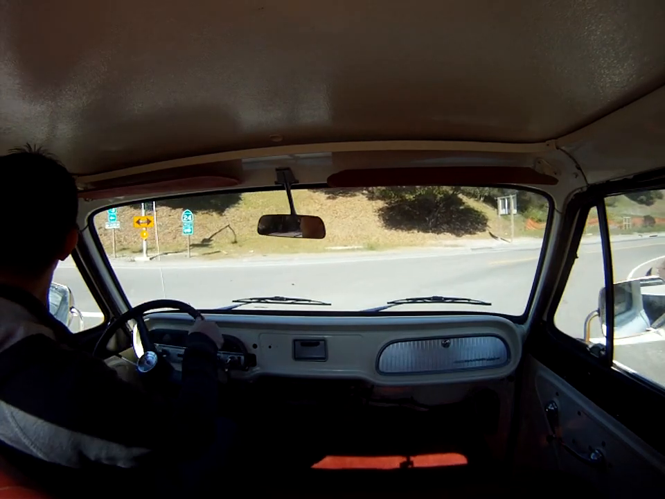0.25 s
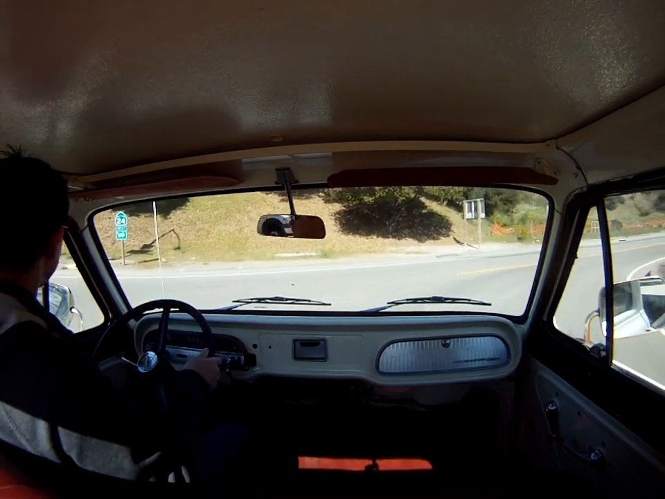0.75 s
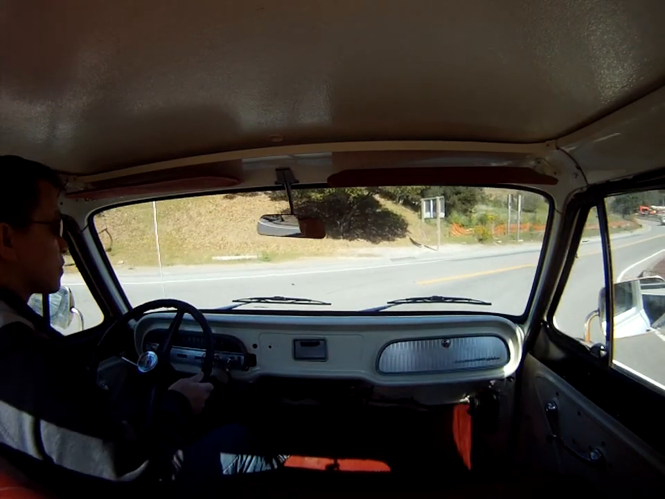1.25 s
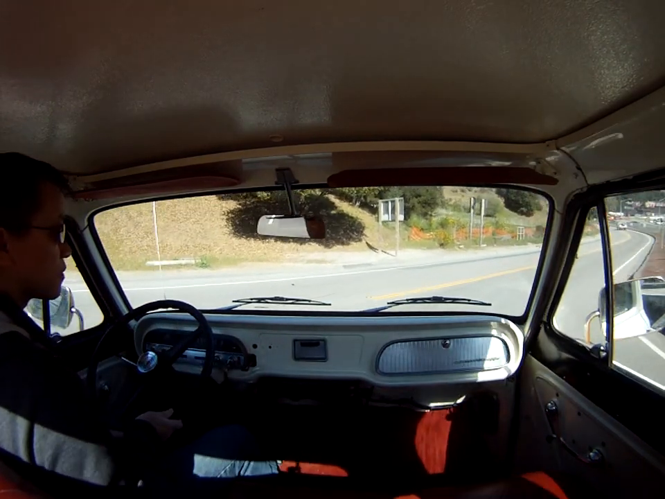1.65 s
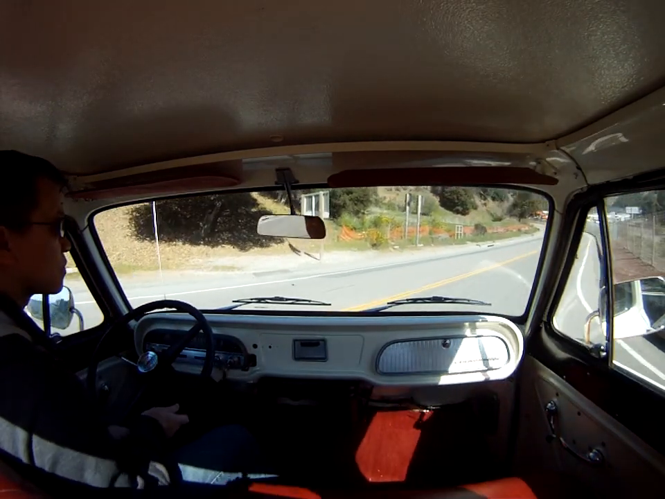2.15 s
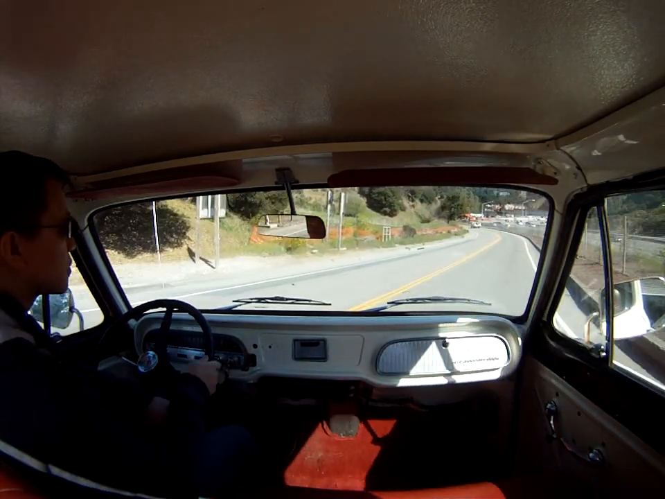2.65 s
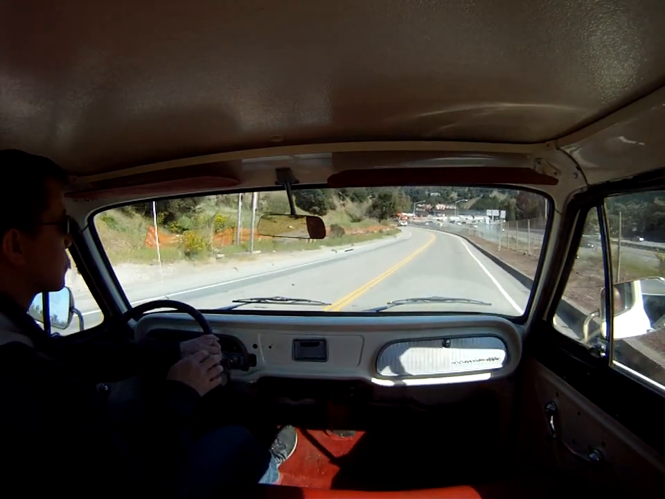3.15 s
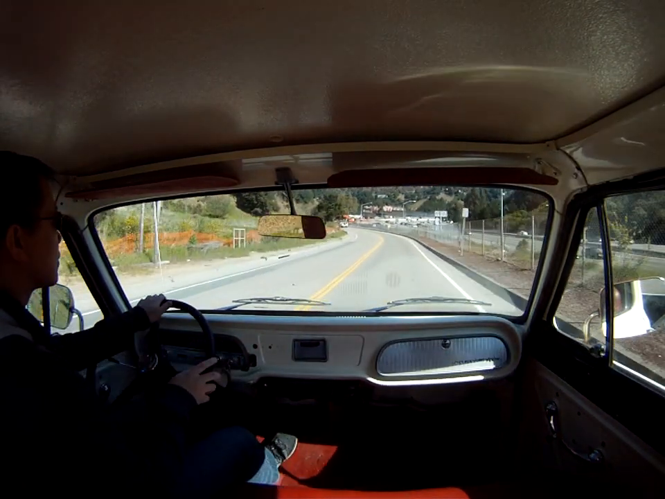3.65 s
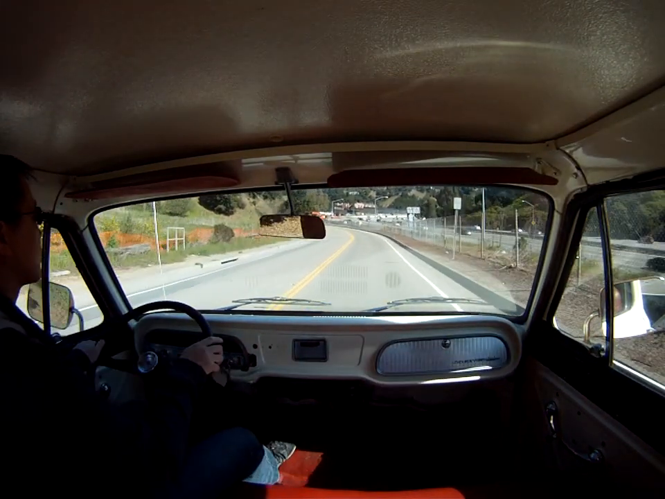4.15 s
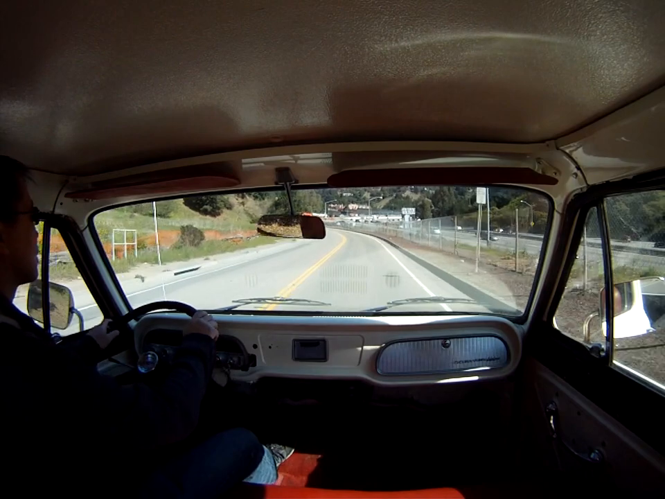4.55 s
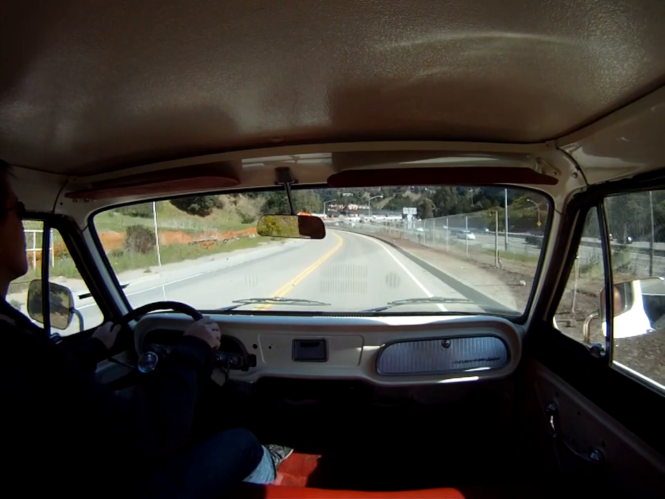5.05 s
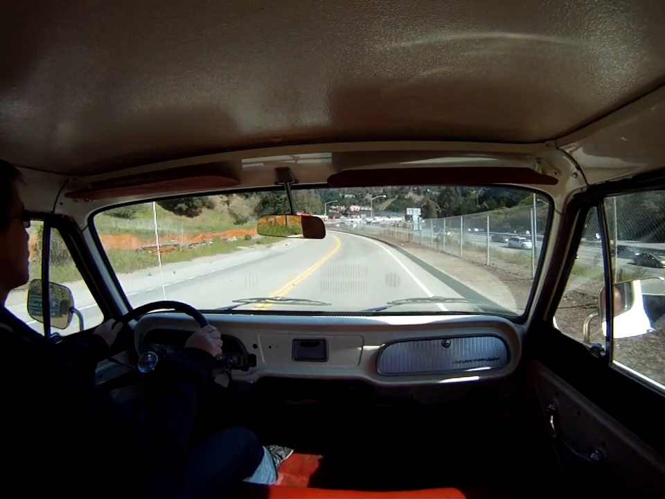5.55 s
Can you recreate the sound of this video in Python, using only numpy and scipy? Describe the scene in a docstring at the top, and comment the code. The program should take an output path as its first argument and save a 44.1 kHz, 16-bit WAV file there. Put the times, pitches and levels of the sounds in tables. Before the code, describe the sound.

A gear lever knocks home over the chugging idle of an old air-cooled truck engine. After about a second the revs jump and keep rising in one long pull, with a hollow boom swelling and fading. Tyre rumble, rushing air and chattering loose panels grow with it, along with a few small knocks. The microphone sits in the middle of the closed-in cab.

```python
"""Inside the cab of an old pickup with an air-cooled flat six at the back.
The engine idles while the gear lever clunks home, then takes up the load and climbs steadily in pitch.
Exhaust orders boom through the cab's resonances over road rumble, fan rush, valve clatter and loose trim.
A small camera samples it all at 12 kHz and holds each sample, which adds a thin fizz on top."""
import sys
import numpy as np
from scipy import signal
from scipy.fft import rfft, irfft, next_fast_len
from scipy.io import wavfile

SR = 44100
rng = np.random.default_rng(int(sys.argv[2]) if len(sys.argv) > 2 else 0)


def put_to_file(sound):
    """Save the sound as 16-bit audio at rate SR, in the file named by the first command-line argument."""
    columns = np.atleast_2d(sound).T  # one column per channel
    safe = np.clip(columns, -1, 1)
    whole_steps = np.round(safe * 32767)
    wavfile.write(sys.argv[1], SR, whole_steps.astype(np.int16))


N = 256220
T = np.arange(N) / SR

# tone of the floor, under tyre roar and lever thuds: frequency_hz, level_db
FLOOR_SPECTRUM = [(180, -7), (250, 3), (300, -1), (345, 1), (410, -0.5), (500, 0.5), (590, 0.5), (690, -3),
                  (780, -19), (1000, -14), (1500, -26)]
# tone of the engine bay, for fan and valves: frequency_hz, level_db
BAY_SPECTRUM = [(750, -1), (800, -3), (1050, -5.5), (1330, -9), (1550, -7), (1800, -9), (2000, -4.5),
                (2280, -2), (2550, -7.5), (3300, -11.5), (3700, -17.5), (4100, -19), (5100, -18),
                (6000, -24.5)]


def from_db(db):
    """Decibels to gain."""
    return 10 ** (np.asarray(db) / 20)


def rms_one(x):
    """Scale to unit rms."""
    return x / np.sqrt(np.mean(x ** 2) + 1e-20)


def in_time(rows):
    """Each column of a curve table at every sample."""
    time_s, *columns = np.transpose(rows)
    return [np.interp(T, time_s, column) for column in columns]


def under_load(idle, loaded, load):
    """Crossfade from the idling value to the value under load."""
    return idle + load * (loaded - idle)


def drift(rate_hz):
    """Smooth random wander with a spread of 1, mostly slower than rate_hz."""
    hop = 40
    pole = np.exp(-2 * np.pi * rate_hz * hop / SR)
    white = rng.standard_normal(N // hop + 2002)
    slow = signal.lfilter([1], [1, -2 * pole, pole * pole], white)[2000:]
    return np.interp(np.arange(N) / hop, np.arange(len(slow)), rms_one(slow))


def coloured(x, spectrum):
    """Shape x with an EQ curve that falls 30 dB an octave beyond its ends; unit rms."""
    hz, db = np.transpose(spectrum)
    size = next_fast_len(N)
    octave, points = np.log2(np.fft.rfftfreq(size, 1 / SR) + 1), np.log2(hz)
    beyond = np.abs(octave - np.clip(octave, points[0], points[-1]))
    gain = from_db(np.interp(octave, points, db) - 30 * beyond)
    return rms_one(irfft(rfft(x, size) * gain, size)[:N])


def noise(spectrum):
    """Noise of the given spectrum, at unit rms."""
    return coloured(rng.standard_normal(N), spectrum)


def band(x, low_hz, high_hz):
    """Gentle band-pass."""
    return signal.sosfilt(signal.butter(2, [low_hz, high_hz], "band", fs=SR, output="sos"), x + 1e-18)


def clicks_at(start_s, db):
    """One click for each blow."""
    hits = np.zeros(N)
    hits[(np.asarray(start_s) * SR).astype(int)] = from_db(db)
    return hits


def blows(start_s, db, t60_s):
    """Envelope that jumps at each blow and dies away."""
    return signal.lfilter([1], [1, -from_db(-60 / (t60_s * SR))], clicks_at(start_s, db) + 1e-18)


def ring(clicks, hz, t60_s):
    """Each click strikes a decaying sine of its own height."""
    decay, angle = from_db(-60 / (t60_s * SR)), 2 * np.pi * hz / SR
    return signal.lfilter([0, np.sin(angle)], [1, -2 * decay * np.cos(angle), decay ** 2], clicks + 1e-18)


def resonance_db(hz, centre_hz, width_hz, lift_db):
    """Lift of one resonance at a given frequency."""
    return lift_db / (1 + (2 * (hz - centre_hz) / width_hz) ** 2)


def unlike_noise():
    """Faint steady noise, unlike in the two channels: the only width in an almost mono scene."""
    # tone of the side signal: frequency_hz, level_db
    side_spectrum = [(15, -32), (25, -0.5), (157, -3), (579, -20), (1000, -20), (2040, -34), (3620, -38),
                     (4990, -35), (6000, -45), (7800, -79), (13200, -120)]
    return from_db(-55.5) * noise(side_spectrum)


def bumps_db():
    """Each bump briefly swells the shaking of the body and the roar of the tyres."""
    # bumps in the road: centre_s, half_length_s, added_shake_db, added_roar_db
    bumps = [(0.143, 0.075, 1, 4), (1.14, .09, 6, 7), (2.52, 0.099, 8, 3), (3.248, 0.19, 4.5, 1.5),
             (3.7, 0.19, 5, 2), (4.748, 0.15, 5, 3.5), (5.62, 0.28, 4, 3.5)]
    centre_s, half_length_s, shake_db, roar_db = np.transpose(bumps)
    swell = np.exp(-((T[:, None] - centre_s) / half_length_s) ** 2)
    return swell @ shake_db, swell @ roar_db


def road(drone_db, bump_shake_db, bump_roar_db):
    """The low bed: body shake, boom of the cab air and tyre roar through the floor."""
    # tone of the shaking body: frequency_hz, level_db
    shake_spectrum = [(12, -10), (22, -15), (32, 7), (48, 2.5), (70, -8), (110, 1.5), (200, -92)]
    # tone of the cab air: frequency_hz, level_db
    boom_spectrum = [(35, -28), (55, 9), (80, -7), (125, 3.5), (160, -9.5), (200, 4), (240, -12.5),
                     (300, -22), (500, -55)]
    shake_db = np.interp(T, [1.25, 1.6], [-22, -31]) + bump_shake_db  # settles once the truck pulls
    shake = from_db(shake_db) * noise(shake_spectrum)
    boom_db = np.interp(T, [1.2, 1.6, 3.2, 5.7], [-31, -28, -25.5, -33])
    boom = from_db(boom_db + 2 * drift(4.4)) * noise(boom_spectrum)
    # as the engine climbs, more of the drone is pitched and less is roar
    roar_db = drone_db + bump_roar_db + np.interp(T, [2.5, 5.5], [-1.5, -4])
    roar = from_db(roar_db + drift(16)) * noise(FLOOR_SPECTRUM)
    return shake + boom + roar


def fan(beats, rush_db):
    """Cooling air rushes and flutters, pulsing lightly with the engine."""
    pulsing = 1 + 0.051 * np.cos(2 * np.pi * beats) + 0.017 * np.cos(4 * np.pi * beats)
    return noise(BAY_SPECTRUM) * pulsing * from_db(rush_db + 0.6 + 1.87 * drift(19))


def valves(beats, rush_db):
    """Valve gear taps six times an engine cycle, each rocker with its own strength."""
    tap_count = np.floor(2 * beats).astype(int)
    rocker_db = 3 * rng.standard_normal(6)[tap_count % 6]
    taps = np.diff(tap_count, prepend=0) * from_db(rocker_db + 2.1 * rng.standard_normal(N))
    # each tap rattles briefly round the engine bay
    bay_tail = rng.standard_normal(N // 200) * from_db(-60 * T[:N // 200] / .02)
    clatter = coloured(signal.fftconvolve(taps, bay_tail)[:N], BAY_SPECTRUM)
    return from_db(rush_db - 5.5) * clatter


def panel_rattle(beats, load, drone_db, bump_shake_db):
    """Loose panels chatter in bursts on the crests of the exhaust beat, harder under load and on bumps."""
    # modes of the dash and door panels: pitch_hz, level_db, t60_s
    panel_modes = [(2050, 4, 0.01), (2288, 4.5, 0.029), (2500, -20.5, 0.017), (2770, -0.5, 0.04),
                   (3136, -3, 0.054), (3378, 1.5, 0.023), (3644, 6, 0.025), (4180, -2.5, 0.018),
                   (4200, -12, 0.016), (4764, -10.5, 0.03), (4850, -6, 0.023), (5700, -12, 0.013)]
    touches_per_s = 400 * (1 + np.cos(2 * np.pi * beats)) * from_db(2.7 * drift(13))
    start_s = np.flatnonzero(rng.random(N) < touches_per_s / SR) / SR
    force_db = rng.uniform(-4, 3.6, len(start_s))
    chatter = 0
    for hz, mode_db, t60_s in panel_modes:
        uneven_db = rng.uniform(-6.5, 2.4, len(start_s))
        chatter += ring(clicks_at(start_s, force_db + mode_db + uneven_db), hz, t60_s)
    level_db = drone_db + under_load(-25.5, -16, load) + 0.18 * bump_shake_db
    return from_db(level_db) * rms_one(chatter)


def trim_ticks():
    """Loose trim gives tiny dry ticks, each with a weaker rebound a moment later."""
    # ticks of the trim: start_s, level_db
    ticks = [(1.3473, -36), (1.3836, -34), (1.3972, -40), (1.4155, -37), (1.4284, -39), (1.4514, -35),
             (1.727, -29), (1.7575, -33), (1.805, -34), (1.8186, -33)]
    start_s, level_db = np.transpose(ticks)
    rebound = clicks_at(start_s + rng.uniform(.003, .009, len(start_s)), level_db + 8)
    return band(clicks_at(start_s, level_db + 12) + rebound, 2800, 7500)


def gear_lever():
    """Each clunk is a crack of metal that rings the linkage, with a floor thud and a short cab tail."""
    # knocks of lever, linkage and loose fittings: start_s, level_db, thud_offset_db, edge_offset_db
    clunks = [(0.109, -35, 12, -21), (0.1612, -38, 1, -26), (0.215, -31.5, 13, -23),
              (0.2943, -31, 8, -21.5), (0.4866, -30, 9, -15.5), (0.5407, -11, -3.5, -37),
              (0.5752, -25, 0, -35), (0.686, -47, 4, -27), (0.816, -25, 9, -23.5), (1.5698, -31, -6, -33),
              (2.256, -38.5, 13, -30), (2.737, -38, 9, -26), (2.8378, -30.5, -22, -25),
              (3.4246, -34.5, -4, -6), (3.5073, -46, -2, -13), (4.6767, -22.5, -2, -36)]
    # tone of the crack: frequency_hz, level_db
    crack_spectrum = [(180, 38), (400, -16), (800, 5.5), (1400, -1), (2200, 2.5), (3100, 3), (3700, -8.5),
                      (5000, -36), (6000, -35)]
    # modes of the gear linkage: pitch_hz, level_db, t60_s
    linkage_modes = [(590, -20, 0.23), (966, -9, 0.063), (1294, -2.5, 0.16), (1510, -1.5, 0.11),
                     (1944, 4.5, 0.051), (2040, -5.5, 0.15), (2245, 5, 0.047), (2820, -3.5, 0.07),
                     (3730, -7.5, .03)]
    start_s, level_db, thud_db, edge_db = np.transpose(clunks)
    snap = blows(start_s, level_db - 9.5, t60_s=0.1)
    tail = blows(start_s, level_db - 12, t60_s=0.39)
    crack = (snap + tail) * noise(crack_spectrum)
    metal = sum(ring(clicks_at(start_s + 0.001094, level_db + mode_db - 14.5), hz, t60_s)
                for hz, mode_db, t60_s in linkage_modes)
    # the heavy floor answers a few milliseconds late
    thud = blows(start_s + 0.004, level_db + thud_db - 10, t60_s=0.24) * noise(FLOOR_SPECTRUM)
    # the bright edge scrapes on as the parts slide home
    edge = rms_one(band(rng.standard_normal(N), 2470, 5600))
    scrape = blows(start_s, level_db + edge_db + 5, t60_s=0.12) * edge
    return crack + metal + thud + scrape


def cab_lift_db(hz):
    """An order swells as it sweeps through a resonance of the cab."""
    # air and panel resonances: centre_hz, width_hz, lift_db
    cab_resonances = [(66, 12, 5), (135, 25, 4), (201, 24, 19), (272, 22, 4), (320, 18, 3), (372, 24, 6),
                      (408, 20, 11), (472, 20, 5), (538, 22, 6), (577, 24, 15)]
    return sum(resonance_db(hz, *row) for row in cab_resonances)


def engine_order(beats, multiple, level_db, waver_db):
    """One sine at a multiple of the exhaust beat; uneven combustion makes its level waver."""
    gain = np.sqrt(2) * from_db(level_db + waver_db * drift(12.5))
    return gain * np.cos(2 * np.pi * (multiple * beats + rng.random()))


def lope(beats, beat_hz, drone_db):
    """No two cylinders fire alike: faint harmonics of the three-beat cycle fill in between the orders."""
    out = 0
    for multiple in [k / 3 for k in range(2, 30) if k % 3]:
        level_db = drone_db - 15 - 1.2 * multiple + 0.87 * cab_lift_db(multiple * beat_hz)
        out += engine_order(beats, multiple, level_db, waver_db=5)
    return out


def chug(load, depth_db=1.8):
    """Gain that throbs with the idle's weak and strong firings and smooths out under load."""
    return from_db((1 - load) * depth_db * drift(rate_hz=20))


def exhaust(beats, beat_hz, load, drone_db, idle_waver_db=3):
    """Three strong orders carry the boom; the weaker ones follow the drone and the cab's resonances."""
    # the strong orders: beat_multiple, idle_db, load_db, load_waver_db
    strong_orders = [(2, -36, -18, 1.67), (3, -31.5, -41, 1.5), (4, -23.5, -43, 2)]
    # exhaust and body resonances that each sweeps through: beat_multiple, centre_hz, width_hz, lift_db
    booms = [(2, 78.53, 13, 3), (2, 110.4, 7.1, 2), (3, 85, 3.3, 27.5), (3, 143.9, 42.2, 18),
             (3, 180.7, 21.4, 17), (3, 202, 15.1, 13), (4, 138, 24, 18.5), (4, 201.3, 28.2, 17),
             (4, 236, 16, 12.5), (4, 269, 26.8, 17.5)]
    # the weaker orders, relative to the drone: beat_multiple, idle_db, load_db
    weak_orders = [(1, 3, -4), (5, -10, -6.5), (6, 5, -8), (7, 0, -13.5), (8, -13, -16), (9, -21, -15),
                   (10, -17, -17), (11, -18, -21), (12, -20, -21), (13, -22, -25), (15, -24, -26)]
    out = 0
    for multiple, idle_db, load_db, load_waver_db in strong_orders:
        lift_db = sum(resonance_db(multiple * beat_hz, *row) for order, *row in booms if order == multiple)
        level_db = under_load(idle_db, load_db, load) + lift_db
        out += engine_order(beats, multiple, level_db, under_load(idle_waver_db, load_waver_db, load))
    for multiple, idle_db, load_db in weak_orders:
        level_db = drone_db + under_load(idle_db, load_db, load) + cab_lift_db(multiple * beat_hz)
        out += engine_order(beats, multiple, level_db - .3, waver_db=1.4)
    return out


def scene():
    """The mix in the middle of the cab; one exhaust beat drives engine, fan, valves and rattle."""
    # exhaust beat of one cylinder bank, half the firing rate: time_s, beat_hz
    beat_curve = [(0.0, 22.94), (0.3, 23.28), (0.4, 22.27), (0.5, 22.36), (1.17, 22.48), (1.25, 24.93),
                  (1.36, 31.7), (1.41, 33.7), (1.49, 37.5), (1.57, 38.89), (2.04, 41.78), (2.57, 44.7),
                  (3.54, 52.59), (4.32, 57.32), (4.48, 58.55), (5.77, 68.3)]
    # how hard the truck works: time_s, drone_db, fan_rush_db
    effort_curve = [(0.0, -36.5, -51), (0.26, -38.5, -49), (0.74, -35.5, -49), (0.86, -34.5, -50),
                    (1.02, -38.5, -46.5), (1.54, -38.5, -49), (2.09, -41.5, -52.5), (2.36, -37.5, -52),
                    (2.73, -36.5, -47.5), (3.35, -30.5, -41), (3.7, -31, -41.5), (3.96, -32.5, -44),
                    (4.24, -34, -44.5), (4.69, -32, -40), (5.05, -31, -40.5), (5.4, -30.5, -39),
                    (5.81, -28, -36)]
    beat_hz, = in_time(beat_curve)
    drone_db, rush_db = in_time(effort_curve)
    drone_db -= 1
    load = np.interp(T, [1.247, 1.355], [0, 1])  # the clutch bites, then is fully home
    bump_shake_db, bump_roar_db = bumps_db()
    beats = np.cumsum(beat_hz * (1 + .0016 * drift(12))) / SR
    cab = chug(load) * exhaust(beats, beat_hz, load, drone_db) + lope(beats, beat_hz, drone_db)
    cab += road(drone_db, bump_shake_db, bump_roar_db)
    cab += fan(beats, rush_db) + valves(beats, rush_db)
    cab += panel_rattle(beats, load, drone_db, bump_shake_db) + gear_lever() + trim_ticks()
    side = unlike_noise()
    return np.array([cab + side, cab - side])


def record(dry, cutoff_hz=15300):
    """Sampled at 12 kHz and held four times over at 48 kHz: faint mirror images fizz around 12 kHz."""
    sampled = signal.resample_poly(dry, 40, 147, axis=1)
    held = np.repeat(sampled, 4, axis=1)
    fizzy = signal.resample_poly(held, 147, 160, axis=1)[:, :N]
    return signal.sosfilt(signal.ellip(12, .1, 80, cutoff_hz, fs=SR, output="sos"), fizzy)


dry = scene()
out = record(dry)
put_to_file(out)
```